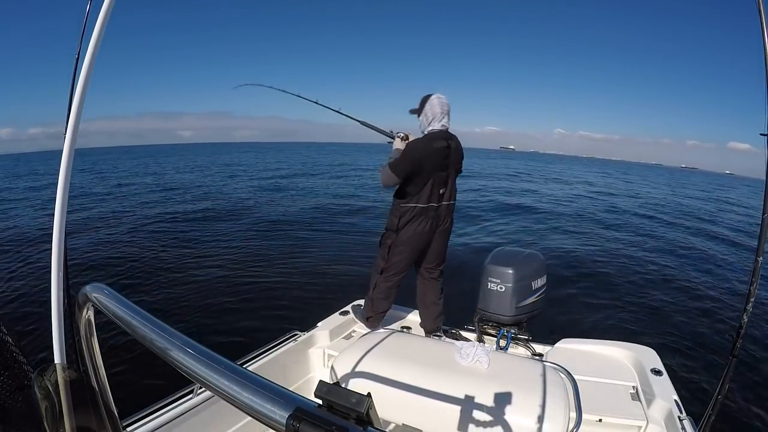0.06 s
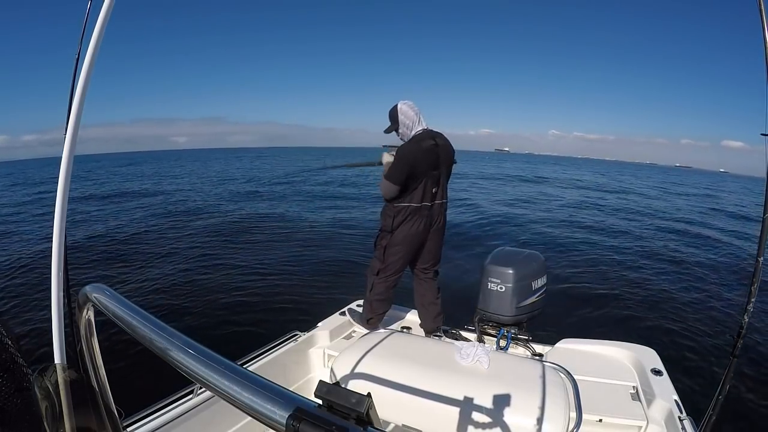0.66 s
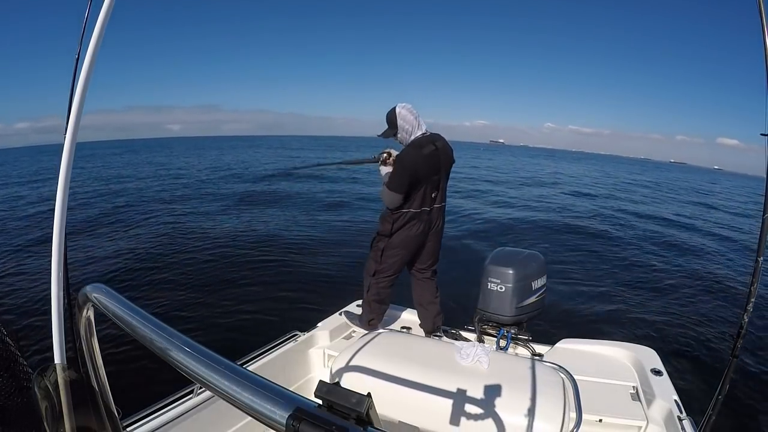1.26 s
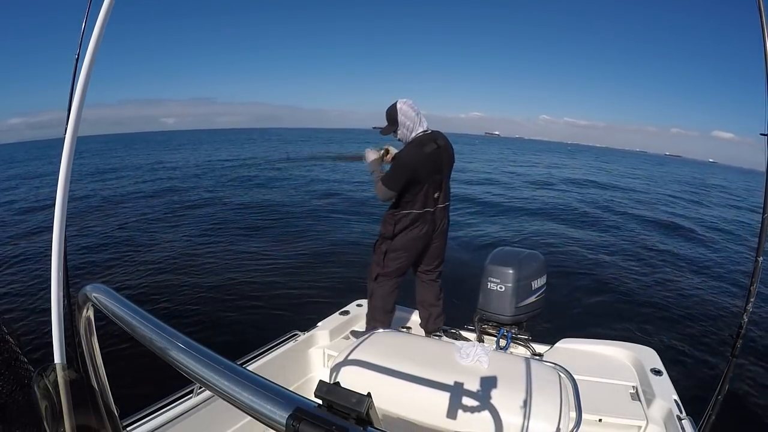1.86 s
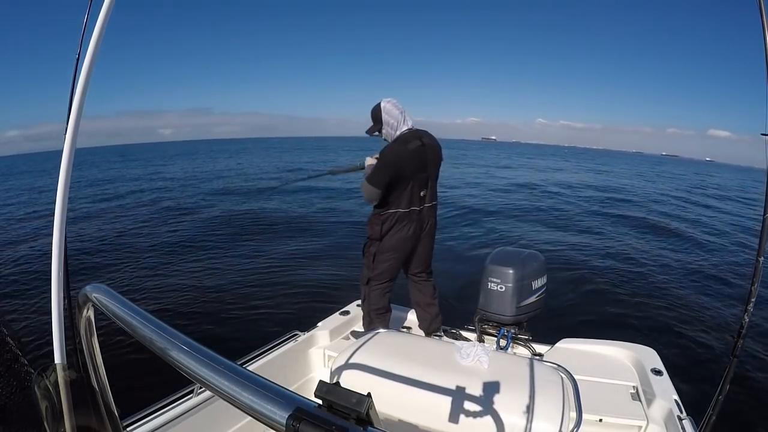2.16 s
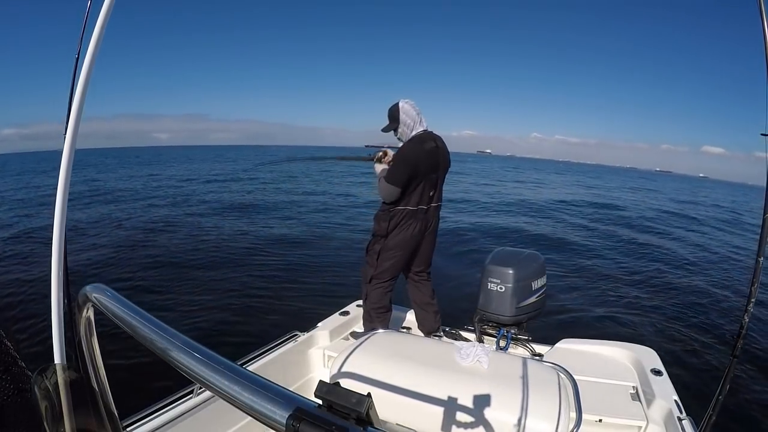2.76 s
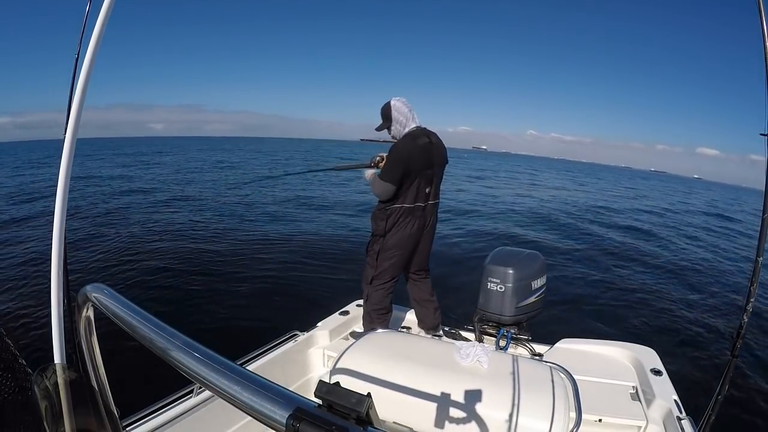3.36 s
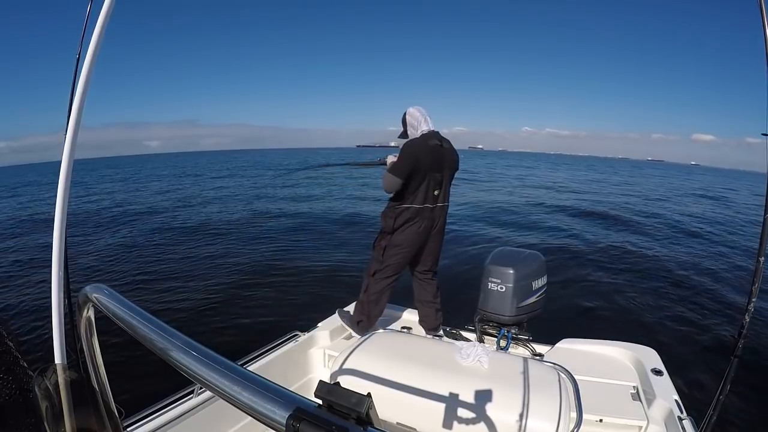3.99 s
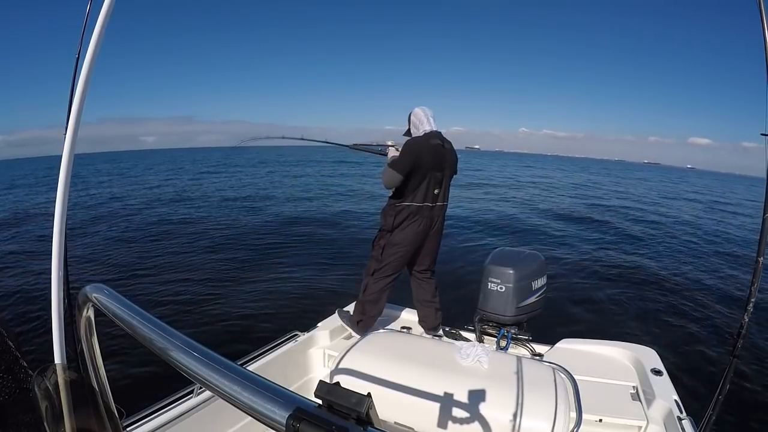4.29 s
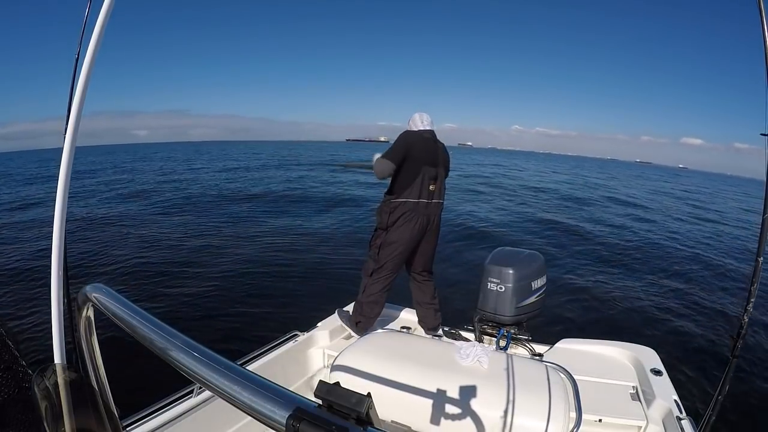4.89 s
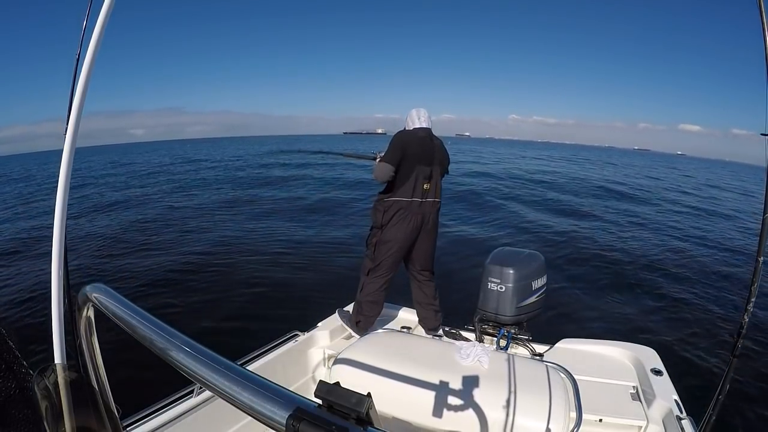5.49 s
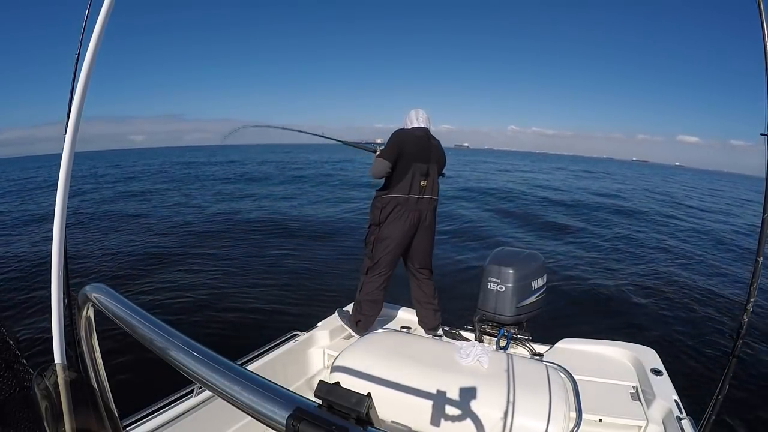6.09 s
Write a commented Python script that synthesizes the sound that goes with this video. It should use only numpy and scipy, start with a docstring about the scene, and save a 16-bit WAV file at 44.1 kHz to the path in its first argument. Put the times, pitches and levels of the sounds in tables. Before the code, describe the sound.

On a boat drifting in open water, low wind rumbles under sloshing and a faint hiss of ripples. Small waves slap the hull in irregular clusters, with hollow gulps and dull thumps. Fishing line hisses off a spool at the start and again midway, each time followed by quiet, uneven cranking of a reel, its gears whining and rasping with a few sharp ticks. Everything is heard from on deck, without echo.

```python
"""On a boat drifting in open water, wind rumbles and water sloshes under a faint hiss of ripples.
On deck a fishing reel is cranked in uneven strokes: its meshing gears whine and rasp, and its pawl ticks.
Friction makes the line hiss, twice running off the spool and twice drawn in through the rod's guides.
Small waves slap the boat: each impact smacks and traps air that rings as a gulping bubble,
while blows of the water set the hull's panels booming."""
import sys
import numpy as np
from scipy.fft import rfft, irfft, next_fast_len
from scipy.io import wavfile
from scipy.ndimage import map_coordinates

SR = 44100
rng = np.random.default_rng(int(sys.argv[2]) if len(sys.argv) > 2 else 0)


def inscribe(sig):
    """Save sig as 16-bit PCM at rate SR to the path in sys.argv[1].

    A 1-D sig is mono; a 2-D sig holds one channel per row.
    Samples are clipped to [-1, 1] before scaling.
    """
    pcm = np.round(np.clip(np.atleast_2d(sig).T, -1, 1) * 32767)
    wavfile.write(sys.argv[1], SR, pcm.astype(np.int16))


N = 270814

# gusts of wind: (time [s], relative level [dB])
GUSTS = [(0.0, -42.5), (0.14, -44), (1.04, -46.5), (1.13, -42), (1.66, -49.5), (1.81, -50), (2.03, -40.5),
         (2.24, -46.5), (2.5, -46), (2.92, -49.5), (3.57, -49.5), (4.0, -42), (4.31, -48.5), (4.8, -51),
         (5.59, -48), (5.81, -50), (6.14, -52.5)]
# spectra of wind, sloshing water and ripples: (frequency [Hz], relative density [dB])
RUMBLE_SPECTRUM = [(11, -17), (18, 2.5), (43, 3.5), (80, -1), (97, -5), (150, -23), (201, -21),
                   (217, -21.5), (240, -33), (260, -27.5), (340, -26.5), (570, -120)]
SLOSH_SPECTRUM = [(71, -54), (120, 2.5), (199, -0.5), (276, -12.5), (447, -14.5), (846, -26.5), (957, -24),
                  (1050, -21.5), (1400, -36), (1820, -62), (3080, -120)]
RIPPLE_SPECTRUM = [(290, -28), (500, -6), (646, -11.5), (778, -9.5), (937, -13), (1050, -17.5),
                   (1440, -14.5), (1780, -15.5), (4010, -18), (5260, -20.5), (15100, -31)]

# line drawn in through the guides: (start [s], end [s], level [dB])
RETRIEVES = [(1.644, 2.247, -70), (4.495, 4.984, -63.5)]
# line running off the spool:
# (start [s], end [s], hiss [dB], full-speed pitch [Hz], whine [dB], spin-up time [s])
PAYOUTS = [(-.02, 0.531, -57, 3180, -59, 0.06), (3.093, 3.63, -55, 3130, -61, .085)]
# the taut line's tone and the fast line's fizz: (start [s], end [s], level [dB])
SONG_SPAN = (0.036, 0.46, -69)
FIZZ_SPAN = (3.17, 3.6, -62.5)
# friction spectra of the line: (frequency [Hz], relative density [dB])
GUIDE_SPECTRUM = [(900, -20), (2000, -20), (3200, 3), (4300, 3), (6000, 0), (8000, -12), (15000, -23)]
FIRST_RUN_SPECTRUM = [(240, -41), (400, -33), (432, 7), (602, 0), (791, -4), (880, 2), (1970, -7),
                      (3100, -2.5), (3890, -10.5), (4740, -13), (5600, -14), (6320, -18), (15000, -36)]
SECOND_RUN_SPECTRUM = [(240, -44), (400, -18), (480, 1), (661, -1.5), (724, 3.5), (805, -18), (868, 5),
                       (1270, -3.5), (2000, -7.5), (2630, -3.5), (3680, -8.5), (4280, -17), (4840, -14.5),
                       (15100, -34.5)]
FIZZ_SPECTRUM = [(3000, -4), (5500, 7), (9000, -6), (12000, -7), (14000, -6), (16000, -12)]
# spool resonances in each run: (frequency [Hz], width [Hz], gain [dB])
FIRST_RUN_MODES = [(2830, 700, -7), (2250, 260, 3.5), (1140, 380, -6), (623, 93, 12)]
SECOND_RUN_MODES = [(4215, 340, -5.5), (2680, 190, -11.5), (1270, 224, -8)]

# ticks of the pawl and brief rings of the reel's frame: (time [s], level [dB])
PAWL_TICKS = [(0.586, -45.5), (0.728, -45), (2.281, -54.5), (2.657, -57), (4.57, -53), (4.822, -52),
              (5.25, -54), (5.83, -57.5)]
FRAME_RINGS = [(.345, -52), (.65, -49), (.75, -52.5), (1.778, -55), (2.581, -49), (2.654, -48.5),
               (2.698, -55)]
# pushes of the handle:
# (peak time [s], rise [s], fall [s], peak tooth rate [Hz], rasp [dB], relative whine [dB])
STROKES = [(.595, .04, .06, 1741, -59, -64.5), (.755, .14, 0.069, 980, -61, -64.5),
           (0.871, 0.048, 0.063, 1320, -61.5, -63), (1.0, .035, 0.095, 1520, -61, -65.5),
           (2.025, 0.087, .055, 1515, -62, -62.5), (2.135, .1, .075, 1206, -60.5, -61.5),
           (2.36, 0.047, .05, 1048, -67, -65.5), (2.463, .045, 0.03, 1510, -62, -62.5),
           (2.595, 0.034, 0.032, 1014, -63.5, -69), (2.678, 0.037, 0.037, 1190, -61, -62),
           (3.505, 0.059, .05, 2010, -61, -66.5), (3.66, .052, .06, 1980, -57.5, -61),
           (3.803, .046, 0.073, 2060, -61, -60), (4.695, .095, 0.065, 1660, -63.5, -65),
           (4.81, .1, 0.065, 1683, -65, -67.5), (5.05, 0.11, .08, 1126, -65, -67.5),
           (5.13, 0.049, 0.041, 1680, -61.5, -65), (5.245, 0.051, 0.056, 1620, -58, -68)]
# harmonics of the gear mesh: (multiple of the tooth rate [1], relative level [dB])
MESH_HARMONICS = [(1, 1.5), (2, -2), (3, -6), (4, -7)]
# response of the reel's body: (frequency [Hz], gain [dB])
REEL_RESPONSE = [(500, 0), (1000, 0), (1400, 3.5), (2000, 8.5), (3000, 6.5), (4200, 1.5), (6000, -2),
                 (10000, -7)]
# spectra of sliding teeth and of the pawl: (frequency [Hz], relative density [dB])
RASP_SPECTRUM = [(410, -60), (700, -3.5), (899, -8.5), (988, -6), (1070, -13), (1330, -4), (2110, -4.5),
                 (2300, -2.5), (2920, -4), (12000, -29.5), (15600, -46), (22000, -120)]
PAWL_SPECTRUM = [(800, -37), (2200, 9), (4200, 15.5), (7000, -3), (15000, -12)]

# blows to the hull: (time [s], relative level [dB], nominal pitch [Hz], 60 dB decay time [s])
HULL_BLOWS = [(0.173, -41, 203, 0.16), (0.565, -24.5, 48, 0.11), (0.65, -32.5, 48.2, 0.55),
              (0.937, -38, 113, 0.1), (0.954, -21, 42.4, 0.15), (1.123, -23, 120.3, 0.063),
              (1.953, -19, 67.5, 0.17), (2.001, -34, 103.6, 0.49), (2.061, -31.5, 121.5, 0.22),
              (2.403, -29, 150, 0.21), (2.45, -29, 85, 0.18), (2.528, -31.5, 125.3, 0.16),
              (2.809, -37, 111.3, 0.31), (2.844, -40, 79.4, 0.41), (3.588, -28, 103.4, 0.067),
              (3.742, -26, 127, 0.1), (3.884, -31, 139.2, 0.13), (3.937, -27.5, 89, 0.11),
              (4.033, -25, 76.6, 0.14), (4.071, -39, 113.8, 0.5), (4.21, -36, 192.4, 0.081),
              (4.951, -35, 43.1, 0.22), (5.376, -29.5, 137.4, 0.16), (5.454, -32, 108.8, 0.22),
              (5.546, -45.5, 156, 0.24)]
# panel modes: (multiple of the nominal pitch [1], gain [dB])
HULL_MODES = [(1.002, 2.5), (1.546, -7.5), (2.4, -20)]
# waves meeting the hull, levels relative: (time [s], smack [dB], spray [dB], 60 dB decay time [s],
# pocket pitch [Hz], pocket [dB], gulp [dB], churn [dB], churn time scale [s])
WAVES = [(.17, -38.5, -44.5, 0.087, 745, -29.5, -51, -55.5, 0.093),
         (0.26, -57, -62, 0.095, 290, -40, -54, -56.5, 0.039),
         (1.104, -46, -66, 0.13, 471, -27.5, -42, -53, 0.069),
         (1.193, -64, -71, .15, 433.6, -39, -36.5, -56, .12),
         (1.946, -36.5, -45.5, 0.1, 535, -26.5, -37, -49, 0.024),
         (1.959, -39.5, -45, .12, 927, -36, -43, -42, 0.023),
         (2.063, -48, -47, 0.076, 309, -56, -52, -64, .03),
         (2.292, -49, -63, 0.59, 873, -38, -53, -52, .045),
         (2.388, -35, -62, 0.037, 1067, -22.5, -38, -48, 0.028),
         (2.393, -47, -53, 0.29, 268.3, -23.5, -36, -50, .04),
         (2.442, -51.5, -71, 0.22, 800, -48, -55, -53, .063),
         (2.504, -42, -54.5, 0.19, 497.6, -45, -37, -48, 0.041),
         (3.573, -45, -72, 0.22, 631, -34.5, -35, -53.5, .04),
         (3.718, -53, -82, 0.21, 754, -40, -48, -55.5, 0.042),
         (3.737, -58, -73, 0.2, 485, -39, -53, -47.5, 0.055),
         (3.861, -43, -43, 0.067, 930, -35, -34.5, -48.5, 0.033),
         (3.872, -51, -41, 0.025, 447, -32, -45, -44.5, .056),
         (3.883, -62, -79, 0.094, 270.5, -29, -48, -46.5, 0.062),
         (4.027, -40.5, -54, 0.11, 767, -36, -45, -54, 0.038),
         (4.211, -65, -64, .1, 337, -39, -49, -60, .063),
         (4.391, -68, -63, 0.13, 558, -46, -49, -53, 0.029),
         (5.348, -48, -51, 0.16, 990, -35.5, -52, -57, 0.028),
         (5.368, -37, -43.5, 0.031, 407.7, -38, -41, -47, 0.06),
         (5.385, -51, -77, 0.087, 249.7, -35, -40, -49, 0.076),
         (5.432, -64, -57, 0.065, 1290, -41, -53, -59, .02),
         (5.44, -49, -48.5, 0.11, 394, -48.5, -33, -48.5, 0.041),
         (5.55, -52, -69, 0.15, 300, -54, -61, -68, .03)]
# spectra of the impact and its spray: (frequency [Hz], relative density [dB])
SMACK_SPECTRUM = [(120, 3.5), (300, 7), (600, 1.5), (950, -1), (1400, -5.5), (2400, -15), (5000, -65),
                  (12000, -61)]
SPRAY_SPECTRUM = [(600, -38), (1700, 6.5), (2700, 6), (4500, -1.5), (7000, -12.5), (15000, -31)]


def amp(db):
    """Amplitude grows tenfold for every 20 dB."""
    return 10 ** (np.asarray(db) / 20)


def unit(x):
    """Dividing by the rms gives a signal of unit power."""
    return x / np.sqrt(np.mean(x ** 2) + 1e-20)


def along(points, hz):
    """A spectrum is interpolated on a logarithmic frequency axis."""
    knots_hz, values = np.transpose(points)
    return np.interp(np.log(hz + 1), np.log(knots_hz + 1), values)


def wobble(rate):
    """A spline through random values, rate of them a second, fluctuates smoothly."""
    return map_coordinates(rng.standard_normal(int(N * rate / SR) + 4), [np.arange(N) * rate / SR])


def filtered(x, response):
    """A linear filter multiplies the spectrum by its frequency response."""
    size = next_fast_len(N + SR // 2)
    return irfft(rfft(x, size) * response(np.fft.rfftfreq(size, 1 / SR)), size)[:N]


def noise(spectrum):
    """Filtering white noise colours it; the result has unit power."""
    return unit(filtered(rng.standard_normal(N), lambda hz: amp(along(spectrum, hz))))


def narrow(hz, width_hz):
    """Random modulation spreads a steady or gliding tone into a narrow band of noise."""
    phase = 2 * np.pi * np.cumsum(hz * np.ones(N)) / SR
    return wobble(width_hz) * np.sin(phase) + wobble(width_hz) * np.cos(phase)


def add(track, start, sound):
    """Superposition: a sound adds to the track from its start time in seconds."""
    part = track[max(round(start * SR), 0):][:len(sound)]
    part += sound[:len(part)]


def fade(t, attack, t60):
    """After its rise, a damped vibration decays exponentially, 60 dB in t60 seconds."""
    return (1 - np.exp(-t / attack)) * amp(-60 * t / t60)


def held(start, end, attack, release):
    """A trapezoidal envelope rises, holds and is gone by the end."""
    t = np.arange(N) / SR
    return np.clip((t - start) / attack, 0, 1) * np.clip((end - t) / release, 0, 1)


def bubble(t, hz, cycles, glide):
    """An air pocket is a damped oscillator; its pitch slides by the ratio glide as it changes shape."""
    life = cycles / hz
    pitch = hz * glide ** np.minimum(t / life, 1)
    return np.sin(2 * np.pi * np.cumsum(pitch) / SR) * fade(t, life / 30, life)


def wind():
    """Turbulence gives low-frequency noise that swells with each gust."""
    gust_db = np.interp(np.arange(N) / SR, *np.transpose(GUSTS))
    return amp(gust_db + 3.5 + 1.1 * wobble(9)) * noise(RUMBLE_SPECTRUM)


def ripples():
    """Many far ripples sum incoherently to an almost steady hiss."""
    return amp(-65 + 0.057 * wobble(16)) * noise(RIPPLE_SPECTRUM)


def agitation():
    """Incoherent powers add: each blow to the hull raises the slosh level [dB], which then settles."""
    calm_db, blow_limit_db, stir_db = -56, -28, -20
    t = np.arange(SR) / SR
    power = np.full(N, amp(calm_db) ** 2)
    for start, db, _, _ in HULL_BLOWS:
        surge = amp(min(db, blow_limit_db) + stir_db) * fade(t, attack=0.08, t60=0.62)
        add(power, start, surge ** 2)
    return 10 * np.log10(power)


def gurgle(level_db, count):
    """Small bubbles resonate at random moments, louder where the water is stirred."""
    t = np.arange(SR // 8) / SR
    out = np.zeros(N)
    for when, pitch, strength in rng.random((count, 3)):
        hz = 220 * 5.5 ** pitch
        db = level_db[int(when * N)] - 7 + 14 * strength ** 3 - 9 * pitch
        add(out, when * N / SR, amp(db) * bubble(t, hz, cycles=33, glide=1.8))
    return out


def slosh():
    """Stirred water radiates low noise and bubble tones in proportion to its agitation."""
    level_db = agitation()
    wash = amp(level_db + 2.8 * wobble(22)) * noise(SLOSH_SPECTRUM)
    return wash + gurgle(level_db, count=170)


def line_friction(start, end, db, spectrum, modes, whirr_db, attack):
    """Sliding friction of the line gives a fluttering hiss and excites the spool's resonances."""
    def response(hz):
        return sum(amp(gain) / (1 + (2 * (hz - centre) / width) ** 2) for centre, width, gain in modes)

    whirr = unit(filtered(rng.standard_normal(N), response))
    level = held(start, end, attack, release=0.13) * amp(db + 1.5 * wobble(190))
    return level * (noise(spectrum) + amp(whirr_db) * whirr)


def line_fizz():
    """The highest friction noise swells late in the second run, as the spool gathers speed."""
    start, end, db = FIZZ_SPAN
    return amp(db) * held(start, end, attack=0.13, release=0.1) * noise(FIZZ_SPECTRUM)


def line_song():
    """A string's pitch follows its tension: the taut line starts sharp and sinks as it slackens."""
    start, end, db = SONG_SPAN
    settled_hz, sharp_hz, slacken_s = 4600, 600, 0.086
    elapsed = np.maximum(np.arange(N) / SR - start, 0)
    hz = settled_hz + sharp_hz * np.exp(-elapsed / slacken_s)
    return amp(db) * held(start, end, attack=0.05, release=0.085) * narrow(hz, width_hz=170)


def spool():
    """Pitch follows rotation speed: a rough whine and its faint octave rise as the spool spins up."""
    start_speed, whine_share = 0.7, 0.686  # fractions of full speed and of the run's length
    t = np.arange(N) / SR
    out = np.zeros(N)
    for start, end, _, top_hz, db, spin_up in PAYOUTS:
        elapsed = np.maximum(t - max(start, 0), 0)
        hz = top_hz * (1 - (1 - start_speed) * np.exp(-elapsed / spin_up))
        whine = narrow(hz, width_hz=420)
        octave = narrow(2 * hz, width_hz=380)
        level = held(start, start + whine_share * (end - start), attack=0.012, release=0.08)
        out += amp(db) * level * (whine + amp(-13) * octave)
    return out


def reel_frame():
    """The frame rings softly in a single damped mode."""
    mode_hz = 996
    t = np.arange(SR // 3) / SR
    ring = np.sin(2 * np.pi * mode_hz * t) * fade(t, attack=0.0084, t60=0.23)
    out = np.zeros(N)
    for start, db in FRAME_RINGS:
        add(out, start, amp(db) * ring)
    return out


def pawl():
    """A brief impact has a broad spectrum: each tick of the pawl is a burst of bright noise."""
    t = np.arange(SR // 3) / SR
    envelope = np.zeros(N)
    for start, db in PAWL_TICKS:
        add(envelope, start, amp(db) * fade(t, attack=0.0001, t60=0.028))
    return envelope * noise(PAWL_SPECTRUM)


def cranking():
    """Tooth rate and loudness follow gear speed, which swells with each push of the handle."""
    idle_hz, ease_db, squareness = 637.7, 8, 2.4
    t = np.arange(N) / SR
    tooth_hz, rasp_gain, whine_gain = np.zeros((3, N))
    for peak, rise, fall, hz, rasp_db, whine_db in STROKES:
        width = np.where(t < peak, rise, fall)
        push = np.exp(-np.abs((t - peak) / width) ** squareness)
        gate = held(peak - 1.94 * rise, peak + 1.9 * fall, attack=0.043, release=0.032)
        effort = gate * amp(-ease_db * (1 - push))
        tooth_hz = np.maximum(tooth_hz, idle_hz + (hz - idle_hz) * push)
        rasp_gain = np.maximum(rasp_gain, amp(rasp_db) * effort)
        whine_gain = np.maximum(whine_gain, amp(whine_db) * effort)
    return tooth_hz, rasp_gain, whine_gain


def gears():
    """Periodic meshing whines at harmonics of the tooth rate; sliding friction adds a rasp."""
    tooth_hz, rasp_gain, whine_gain = cranking()
    # an uneven hand and scatter in the tooth timing smear the higher harmonics
    jitter = 1 + 0.014 * wobble(90) + 0.033 * wobble(600)
    phase = 2 * np.pi * np.cumsum(tooth_hz * jitter) / SR
    whine = np.zeros(N)
    for order, db in MESH_HARMONICS:
        bite_db = 3 * wobble(45) + 3 * wobble(220)  # worn teeth grip and slip
        body_db = along(REEL_RESPONSE, order * tooth_hz)
        whine += amp(db + body_db + bite_db) * np.sin(order * phase)
    rasp = noise(RASP_SPECTRUM) * amp(2.1 * wobble(170))
    return whine_gain * whine + rasp_gain * rasp


def hull():
    """Struck panels boom in their modes, damped by water; the pitch depends on where the wave lands."""
    t = np.arange(SR // 2) / SR
    out = np.zeros(N)
    for start, db, hz, t60 in HULL_BLOWS:
        envelope = fade(t, attack=0.0067, t60=t60)
        for ratio, mode_db in HULL_MODES:
            pitch = hz * ratio * np.exp(rng.normal(0, 0.049))
            add(out, start, amp(db + mode_db) * np.sin(2 * np.pi * pitch * t) * envelope)
    return out


def churn():
    """Water gargles round each air pocket: a broad, hollow resonance that swells and ebbs."""
    t = np.arange(N) / SR
    out = np.zeros(N)
    for start, _, _, _, hz, _, _, db, time_scale in WAVES:
        age = np.maximum(t - start, 0) / (0.36 * time_scale)  # 1 at the crest of the swell
        out += amp(db) * age * np.exp(1 - age) * narrow(hz, width_hz=0.48 * hz)
    return out


def slaps():
    """Each impact gives a noisy smack and spray, and compresses a pocket of air into resonance."""
    gulp_delay_s, gulp_ratio = 0.022, 0.352  # a larger, deeper pocket closes just after the first
    t = np.arange(SR // 3) / SR
    smack, spray, pockets = np.zeros((3, N))
    for start, smack_db, spray_db, t60, hz, pocket_db, gulp_db, _, _ in WAVES:
        contact = fade(t, attack=0.0008, t60=t60)
        add(smack, start, amp(smack_db + 1.5) * contact)
        add(spray, start, amp(spray_db - 4.5) * contact)
        add(pockets, start, amp(pocket_db + 1.5) * bubble(t, hz, cycles=10.6, glide=0.49))
        gulp = bubble(t, gulp_ratio * hz, cycles=12.3, glide=0.35)
        add(pockets, start + gulp_delay_s, amp(gulp_db + 6) * gulp)
    splats = unit(amp(2.4 * wobble(380)))  # the contact runs unevenly along the hull
    return splats * (smack * noise(SMACK_SPECTRUM) + spray * noise(SPRAY_SPECTRUM)) + pockets


def scene():
    """In a free field the sources add without echo: sea, line, reel and waves on the hull."""
    sea = wind() + ripples() + slosh()
    line = line_fizz() + line_song()
    for run in RETRIEVES:
        line += line_friction(*run, GUIDE_SPECTRUM, SECOND_RUN_MODES, whirr_db=-7, attack=0.15)
    first, second = (run[:3] for run in PAYOUTS)
    line += line_friction(*first, FIRST_RUN_SPECTRUM, FIRST_RUN_MODES, whirr_db=-4, attack=0.054)
    line += line_friction(*second, SECOND_RUN_SPECTRUM, SECOND_RUN_MODES, whirr_db=-4, attack=0.079)
    reel = spool() + reel_frame() + pawl() + gears()
    waves = hull() + churn() + slaps()
    return (sea + line + reel + waves)[None]


def record(dry):
    """An ideal low-pass filter removes everything above the band limit."""
    limit_hz = 15290
    return filtered(dry[0], lambda hz: hz < limit_hz)[None]


dry = scene()
out = record(dry)
inscribe(out)
```